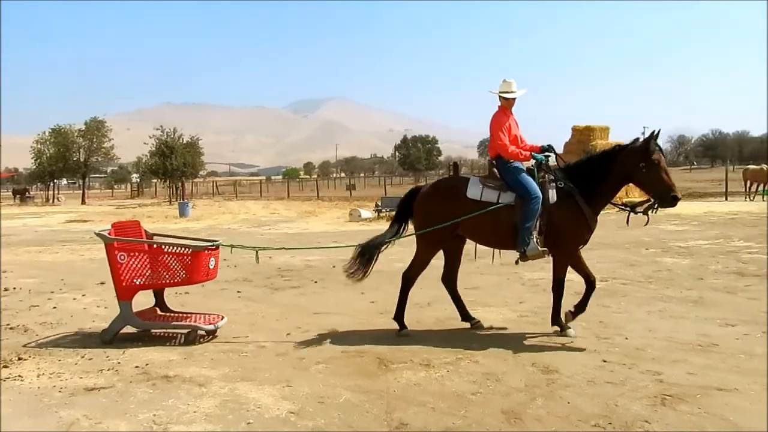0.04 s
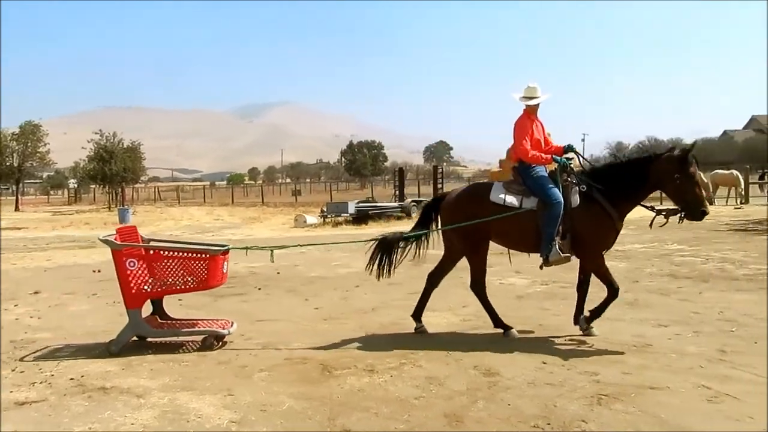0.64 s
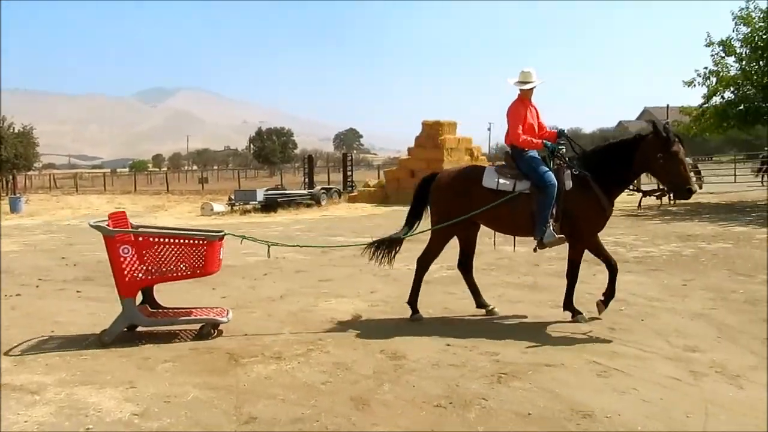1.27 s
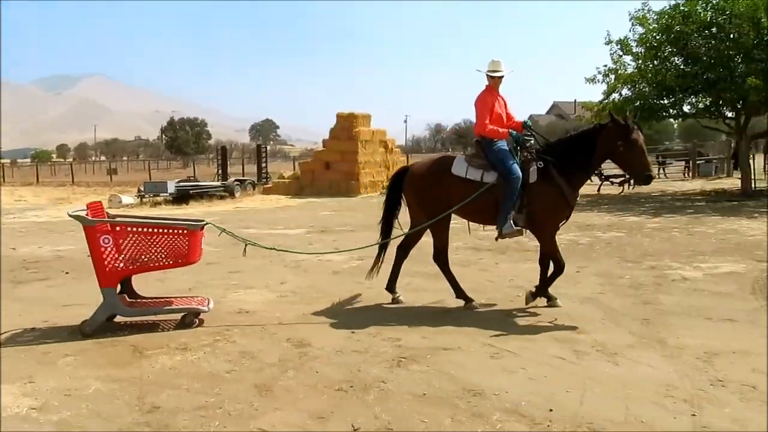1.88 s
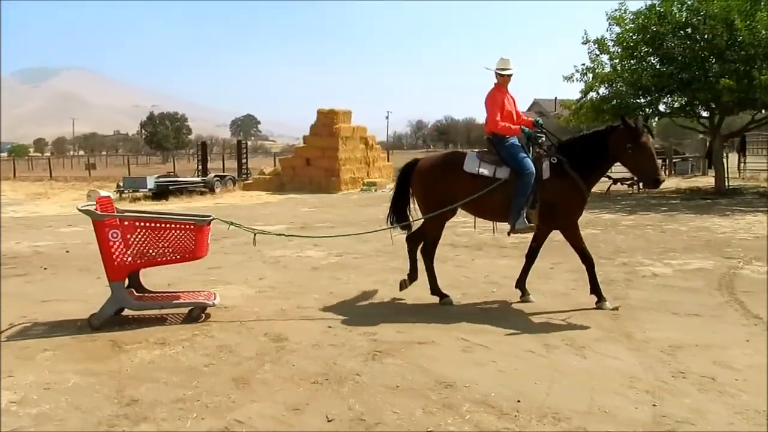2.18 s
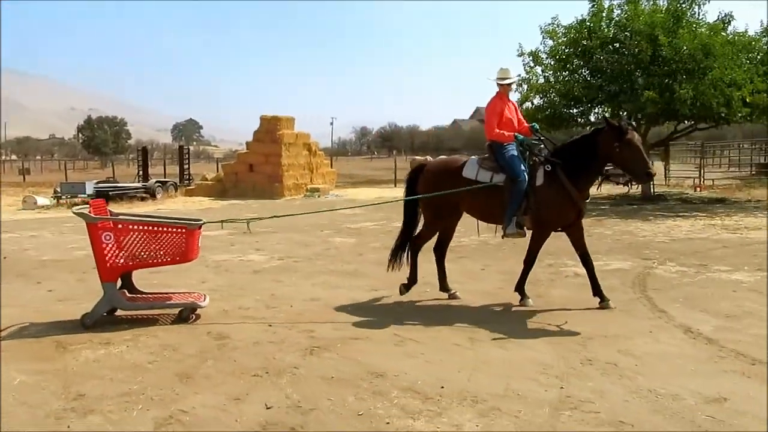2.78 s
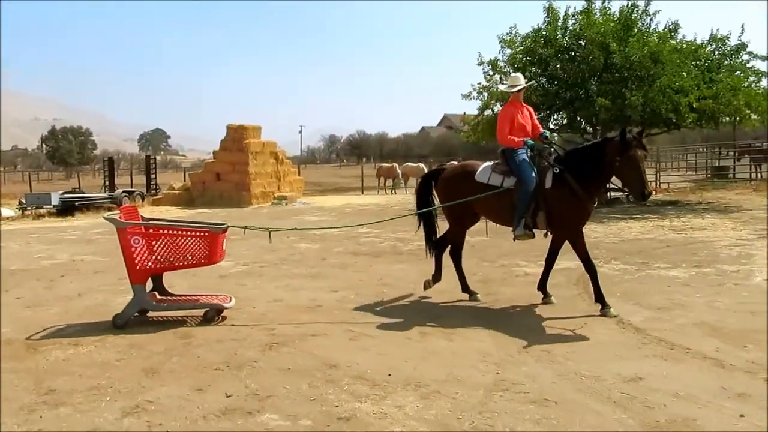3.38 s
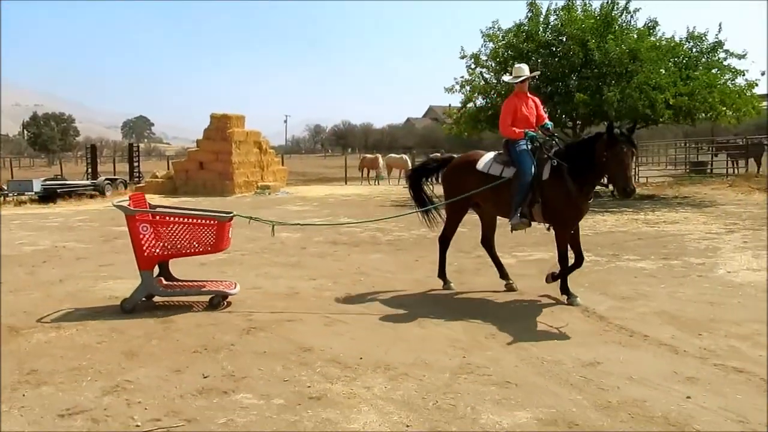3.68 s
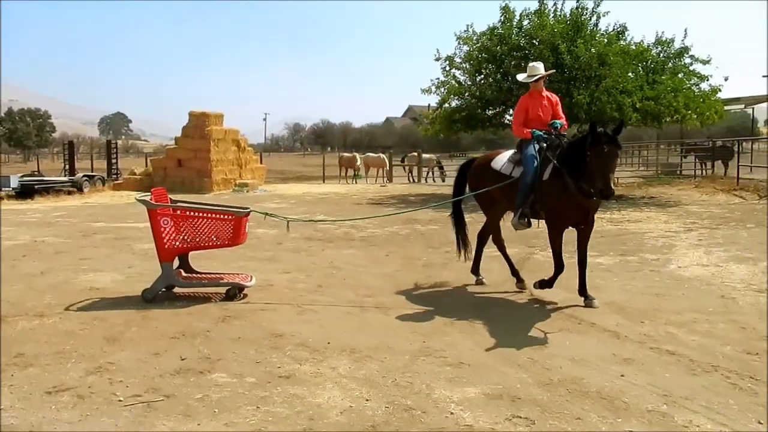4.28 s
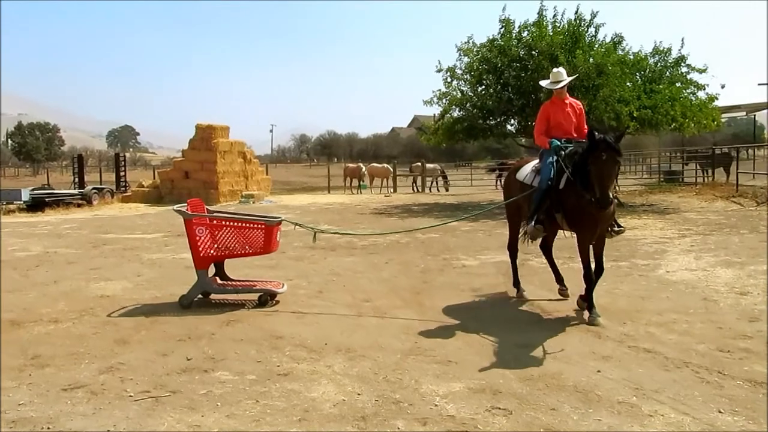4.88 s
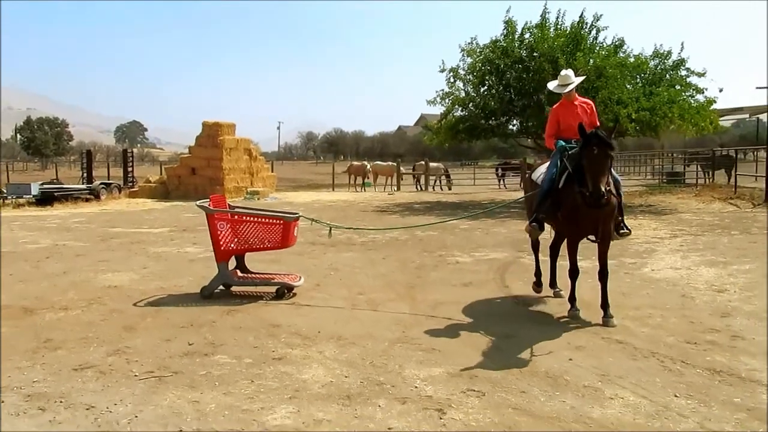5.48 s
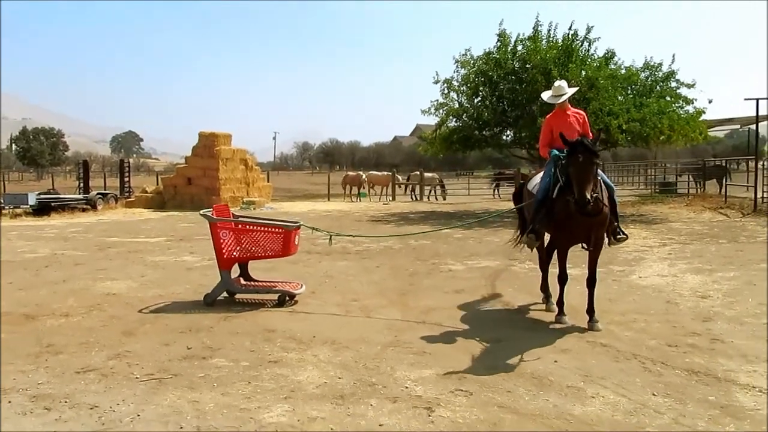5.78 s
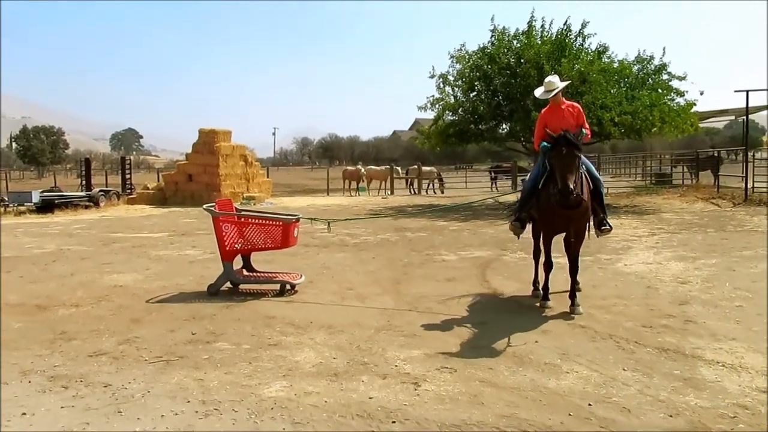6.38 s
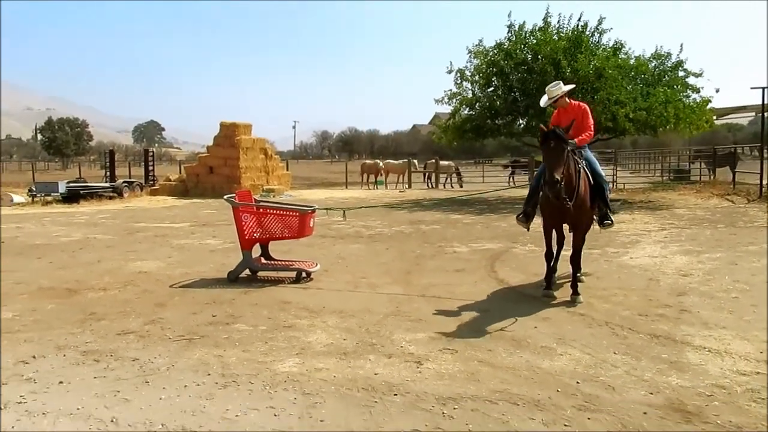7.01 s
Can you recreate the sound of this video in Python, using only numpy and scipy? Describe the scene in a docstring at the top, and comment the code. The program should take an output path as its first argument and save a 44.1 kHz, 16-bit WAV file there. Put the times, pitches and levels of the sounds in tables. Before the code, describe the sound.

An empty plastic shopping cart rattles over packed dirt from the start, slightly to the left, towed by a horse in an open yard. Gusts rumble and thump on the microphone for the first second. The basket buzzes, jolts and clacks in surges, loudest from 1 to 2 seconds and again near 3, with occasional hollow hoof knocks. The wind returns between about 2.2 and 3.6 seconds. Hooves scrape grit from 3.7 to 4.9 seconds as the rattle weakens, and the cart stops at about 5. Sharp harness clicks follow near 5.2 seconds, then light clops and scuffs as the horse settles. A small metal part pings thinly and faintly throughout. Distant birds give three brief, faint whistles between 5 and 7 seconds over soft outdoor air. Wind buffets build again from about 6.8 seconds to the end, just after 7.

```python
"""An empty plastic shopping cart rattles over packed dirt, towed on a rope by a horse that turns and stops.
Grit under the wheels keeps the basket buzzing, pebbles jolt it, and loose flaps and casters clack.
Hooves clop, scuff and drag, the harness clicks, and a small springy metal part pings thinly close by.
Gusts rumble and thump on the microphone; birds whistle far off in the quiet air of the open yard."""
import sys
import numpy as np
from scipy import signal
from scipy.fft import rfft, irfft, next_fast_len
from scipy.io import wavfile
from scipy.ndimage import uniform_filter1d

SR = 44100
rng = np.random.default_rng(int(sys.argv[2]) if len(sys.argv) > 2 else 0)


def master(y):
    """Save y as 16-bit WAV."""
    cut = np.clip(np.atleast_2d(y).T, -1, 1)
    pcm = np.round(cut * 32767)  # scale
    wavfile.write(sys.argv[1], SR, pcm.astype(np.int16))


N = 319725
TIME = np.arange(N) / SR
FFT_SIZE = next_fast_len(N + SR // 4)
FREQS = np.maximum(np.fft.rfftfreq(FFT_SIZE, 1 / SR), 1)
STOP_S = 5.1   # the cart comes to rest

# Levels in the tables are relative: each layer has its own trim.
# The cart surges as the rope tightens and slackens. Each row: time in seconds, rattle level in dB.
ROLL = [(0.0, -40.5), (0.45, -43.5), (0.75, -43), (1.0, -31), (1.3, -36), (1.55, -37), (1.85, -37),
        (2.0, -47.5), (2.25, -39), (2.45, -48.5), (2.8, -54.5), (2.88, -41), (2.97, -33), (3.15, -45),
        (3.66, -39.5), (3.88, -51), (4.08, -42), (4.25, -54), (4.9, -53.5)]
# The basket jolts on its frame. Each row: start in seconds, level in dB, extra treble in dB.
JOLTS = [(0.027, -16, 6.5), (0.11, -26, 9), (0.153, -31, -5), (0.2, -27, -2), (0.237, -19, -5),
         (0.282, -28, 2), (0.305, -19.5, 6.5), (0.371, -20, 1), (0.436, -23.5, 8), (0.481, -17, 4),
         (0.521, -17, 9.5), (0.572, -18, 0.5), (0.608, -16, 0.5), (0.679, -18.5, -4), (0.713, -32, 17),
         (0.734, -22, -10), (0.759, -20, 4), (0.816, -17, -1), (0.878, -15.5, -8), (0.925, -6.5, 3.5),
         (0.951, -19.5, 10), (0.976, -15, 4.5), (1.006, -14.5, 3), (1.027, -13.5, 0), (1.08, -15.5, 1.5),
         (1.108, -15.5, 0), (1.162, -16.5, 6.5), (1.232, -16, 4), (1.274, -11.5, 1), (1.3, -14, 2.5),
         (1.32, -17.5, 7.5), (1.364, -7.5, 0.5), (1.411, -15.5, -9), (1.445, -16, 3), (1.486, -14, -0.5),
         (1.574, -15, 2), (1.622, -21.5, 6), (1.644, -7, 6.5), (1.679, -16.5, -0.5), (1.742, -13.5, 3.5),
         (1.782, -13, 0), (1.827, -13.5, 5), (1.843, -20, -6), (1.879, -13.5, -1), (1.912, -17, -12),
         (1.951, -13, -1.5), (1.967, -19.5, 0), (2.055, -22, 1), (2.037, -18.5, -0.5), (2.132, -13.5, -4.5),
         (2.172, -18.5, 0), (2.202, -19.5, 5), (2.214, -26, 1), (2.31, -20.5, -0.5), (2.353, -35, 0),
         (2.5, -25, -2), (2.713, -26, 3.5), (2.855, -19.5, -12), (2.885, -14.5, 3), (2.934, -8, -15),
         (2.969, -15, 5.5), (3.043, -14.5, 0.5), (3.122, -23, 12.5), (3.147, -21.5, 8), (3.196, -19.5, 12),
         (3.243, -16.5, -1), (3.304, -17, -7), (3.347, -30, -15), (3.433, -14, 2), (3.485, -16, -2),
         (3.506, -25.5, 6), (3.543, -19, 4.5), (3.643, -14, 1.5), (3.662, -13.5, 1), (3.72, -16.5, -5),
         (3.805, -20.5, -8), (3.832, -35, -3), (3.91, -26, 1), (3.976, -20.5, -3), (4.06, -21, -9),
         (4.082, -25, -6), (4.111, -26, -12), (4.173, -19, -5), (4.341, -22.5, -10), (4.468, -27.5, -2),
         (4.567, -27.5, -9), (4.7, -21.5, 0.5), (4.765, -22, -1.5)]
# The cart's broad tone. Each row: frequency in Hz, level in dB.
CART_EQ = [(60, -13.5), (150, -36), (300, -8), (550, -8.5), (750, 2.5), (980, -3.5), (1600, 4), (3000, -9),
           (4500, -15.5), (6500, -24), (8500, -33), (12000, -37), (15500, -43)]
# Peaks and dips in the tone of the cart's rattle. Each row: centre in Hz, width in Hz, gain in dB.
RATTLE_PEAKS_DIPS = [(797, 56, 2.5), (1640, 320, -5.5), (1980, 250, -7.5), (2360, 220, 2.5),
                     (2700, 60, 0.5), (3060, 220, 5), (3450, 310, -1), (3700, 130, 5.5), (4870, 200, -1.5),
                     (5600, 190, 0), (6560, 270, 1.5)]
# The cart sits to the left. Each row: frequency in Hz, phase lead of the left channel in radians.
LEFT_LEAD = [(1500, 0), (3000, 0.48), (5000, 0.97), (9000, 0), (15000, 1.7)]
# Stereo width of near sounds. Each row: frequency in Hz, side against mid in dB.
NEAR_WIDTH = [(60, -35), (350, -63), (900, -52), (1700, -26), (3000, -15.5), (5000, -7), (9000, -2),
              (15000, 0.5)]
# Hard knocks of hooves and the cart's basket, some with two quick contacts.
# Each row: start in seconds, level in dB, pitch in Hz.
KNOCKS = [(0.086, -25.5, 1640), (1.6436, -16, 1080), (1.6479, -18, 1000), (2.598, -23.5, 1110),
          (2.935, -31, 1500), (3.337, -18.5, 1470), (4.896, -21.5, 1570), (5.05, -35, 790),
          (5.095, -30, 900), (5.196, -24, 1090), (5.339, -29.5, 1610), (5.364, -37, 1290),
          (5.735, -39, 1190), (6.067, -40, 1590), (6.172, -39, 1450), (6.275, -28.5, 1900),
          (6.279, -27.5, 1390), (6.32, -40, 1490), (6.452, -34.5, 1310), (6.471, -39, 1500),
          (6.507, -39, 1450), (6.602, -36, 1150), (6.673, -40.5, 1510), (6.919, -39, 2700),
          (7.232, -34, 1550)]
# The tone of loose dirt. Each row: frequency in Hz, level in dB.
SCUFF_EQ = [(250, -23), (550, 27), (2500, 10), (4000, -35), (9000, -37)]
# Hooves drag as the horse turns. Each row: start in seconds, length in seconds, level in dB.
SCRAPES = [(3.65, 0.077, -42.5), (3.97, 0.02, -49), (4.002, 0.13, -44), (4.668, 0.07, -43.5),
           (4.758, 0.022, -40), (4.828, 0.094, -51.5), (6.215, 0.049, -53), (6.287, 0.067, -54),
           (6.44, 0.07, -64)]
# Harness clicks. Each row: start in seconds, level in dB, 60 dB decay time in seconds, low cut in Hz,
# ring pitch in Hz, ring against snap in dB.
TACK_CLICKS = [(0.32, -20.5, 0.011, 2500, 5840, -2), (0.926, -27, 0.025, 1010, 5600, 6),
               (4.015, -26, 0.023, 4960, 5940, -6), (4.746, -23.5, 0.013, 3500, 6000, -2),
               (5.195, -13, 0.006, 900, 4200, -13), (5.2, -25.5, 0.032, 1200, 4100, -12),
               (5.212, -28, 0.004, 1500, 2870, -14), (5.3385, -5, 0.012, 12000, 13700, -8),
               (5.361, -36, 0.04, 1500, 3570, -20), (5.735, -35, 0.042, 1000, 3100, -28),
               (6.229, -43, 0.1, 1000, 2900, -30), (6.276, -33.5, 0.065, 1000, 2780, -26)]
# The tone of those clicks. Each row: frequency in Hz, level in dB.
TACK_EQ = [(300, 16), (1000, -0.5), (1550, 3.5), (2400, 1), (2950, 9.5), (3250, 3), (3600, 3.5), (4250, 0),
           (5000, -6.5), (6400, -10), (8000, -17), (13000, -24), (15500, -30)]
# Metal pings. Each row: start in seconds, first upper mode's level in dB, upper pair's detune in Hz,
# second upper mode against the first in dB, first and second lower modes' levels in dB.
PINGS = [(0.0, -61, 8, -1, -68, -75), (0.215, -64, 3, -12, -82, -70), (0.481, -58, 29, -9, -58, -75),
         (0.575, -58, 45, -10, -70, -75), (1.124, -60, 4, 11, -81, -57), (1.732, -60, 13, 4, -69, -69),
         (2.428, -58.5, -10, -1, -79, -63), (2.748, -48.5, -10.5, -4, -66, -61),
         (2.987, -55, -10.5, -2, -64, -66), (3.17, -62, 3, -10, -72, -65), (3.4, -70, 19, -5, -66, -63),
         (3.679, -54, 7, -7, -68, -60), (3.92, -52, 2, -7, -69, -70), (4.17, -63, 14, -15, -70, -72),
         (4.737, -60, 56, -15, -77, -74), (4.914, -57, 11, 1, -69, -71), (5.07, -72, 35, -16, -70, -69),
         (5.404, -53.5, 3, -5, -55.5, -67), (5.69, -64, 42, -17, -71, -72), (5.85, -76, 40, -15, -66, -82),
         (6.042, -51, 0, -19, -68, -70), (6.332, -48.5, 39.5, -18, -65, -80),
         (6.475, -72, 38, -18, -64, -78), (7.233, -59, 10, -10, -70, -70)]
# The pings' beating upper pair. Each row: pitch before detuning in Hz, 60 dB decay time in seconds.
UPPER_MODES = [(12123, .95), (12161, .8)]
# Gusts. Each row: time of reaching full strength in seconds, hold in seconds, level in dB.
GUSTS = [(0.01, 0.03, -16.5), (0.259, 0.061, -16.5), (0.344, 0.019, -19), (0.677, 0.029, -19.5),
         (0.756, 0.11, -19.5), (1.747, 0.13, -30.5), (2.247, 0.035, -18.5), (2.389, 0.057, -19),
         (2.516, 0.057, -24.5), (2.774, 0.089, -23), (2.892, 0.099, -28.5), (3.222, 0.085, -32),
         (3.352, 0.082, -21.5), (3.447, 0.15, -25.5), (3.622, 0.057, -29.5), (3.744, 0.065, -31),
         (3.886, 0.042, -38), (4.24, 0.091, -36), (4.42, 0.055, -39), (4.731, 0.02, -42),
         (4.948, 0.027, -34), (5.075, 0.019, -28.5), (5.162, 0.042, -27), (5.259, 0.024, -26),
         (5.381, 0.04, -33), (5.583, 0.035, -30.5), (5.715, 0.032, -31.5), (5.918, 0.08, -28.5),
         (6.048, 0.062, -29), (6.164, 0.012, -29.5), (6.218, 0.034, -34.5), (6.332, 0.004, -27.5),
         (6.433, 0.021, -27), (6.492, 0.015, -31.5), (6.58, 0.011, -34), (6.742, 0.013, -27.5),
         (6.805, 0.0072, -28.5), (6.875, 0.053, -29.5), (6.984, 0.012, -19), (7.065, 0.31, -25.5)]
# The wind bed, stiff at first, then a light breeze. Each row: time in seconds, level in dB.
WIND_BED = [(0.0, -16.5), (0.34, -23), (0.4, -24.5), (0.6, -20.5), (0.87, -25.5), (0.95, -42), (1.3, -43.5),
            (2.1, -40), (2.33, -29), (2.66, -33.5), (2.72, -61), (3.0, -37), (3.18, -47), (3.9, -42.5),
            (4.15, -50.5), (4.8, -49), (5.0, -36), (5.6, -49), (7.25, -47)]
# Single eddies thump the microphone. Each row: centre time in seconds, level in dB, pitch in Hz.
BUFFETS = [(0.023, -2.5, 407), (0.047, -5, 305), (0.091, -14, 250), (0.105, -10, 236), (0.161, -11, 286),
           (0.231, -11.5, 196), (0.256, -13, 382), (0.3, -7, 250), (0.319, -10, 331), (0.362, -2.5, 360),
           (0.459, -12, 292), (0.57, -8.5, 210), (0.636, -15, 225), (0.682, -9, 170), (0.703, -12, 264),
           (0.776, -8.5, 278), (0.822, -3, 315), (0.839, -1.5, 393), (0.88, -20, 262), (2.104, -18, 151),
           (2.251, -14.5, 66), (2.257, -9, 330), (2.404, -7.5, 207), (2.407, -13, 69), (2.446, -8.5, 229),
           (2.565, -12, 167), (2.805, -6.5, 230), (2.825, -7, 207), (3.363, -16, 258), (3.382, -12, 210),
           (3.42, -6, 340), (3.481, -12.5, 177), (3.514, -17.5, 199), (3.569, -14, 154), (3.591, -13, 258),
           (5.204, -16, 176), (5.266, -14, 220), (6.121, -14.5, 154), (6.392, -17, 186),
           (6.755, -11.5, 157), (6.811, -8.5, 224), (6.869, -14.5, 164), (6.929, -14, 135),
           (6.993, -6.5, 348), (7.009, -6, 157), (7.105, -6.5, 262), (7.129, -9, 159), (7.192, -9.5, 210),
           (7.241, -6, 140), (7.243, -12.5, 61)]
# Tones of light wind, strong wind and the roar on top. Each row: frequency in Hz, level in dB.
BREEZE_EQ = [(20, -42), (35, -25.5), (70, -5.5), (105, -0.5), (150, -0.5), (210, -4), (350, -13.5),
             (470, -27.5), (540, -42.5), (900, -79)]
GUST_EQ = [(20, -45), (35, -39), (70, -22.5), (130, -2), (260, 0), (400, -2), (480, -5.5), (535, -32.5),
           (650, -39), (1200, -71)]
ROAR_EQ = [(350, -18.5), (520, 7), (680, 8), (850, -2), (1200, -21), (2000, -79)]
# Stereo width of the wind. Each row: frequency in Hz, side against mid in dB.
WIND_WIDTH = [(40, -40), (90, -43), (170, -28), (350, -14.5), (700, 1)]
# The wind's angle on the ports shifts as the microphone turns.
# Each row: time in seconds, side gain in dB, roar in a strong wind in dB.
WIND_ANGLE = [(0, -9, -28.5), (0.3, -8, -21.5), (0.9, -13.5, -15), (2.3, -7, -21), (2.8, 2.5, -18),
              (6.5, 2.5, -30), (7.25, 13.5, -20)]
# Far birds. Each row: start in seconds, length in seconds, first and last pitch in Hz, level in dB.
BIRD_CALLS = [(5.024, 0.089, 3300, 3210, -60), (5.776, 0.048, 3220, 3180, -50.5),
              (6.733, 0.099, 830, 930, -49)]
# The tone of the yard's still air. Each row: frequency in Hz, level in dB.
YARD_EQ = [(25, -26), (80, 11.5), (160, -24.5), (400, 4), (900, -0.5), (2000, -6.5), (3200, -8),
           (4500, -12), (5700, -14), (9000, -19.5), (12500, -24.5), (14000, -33), (15500, -37)]
# Stereo width of that air. Each row: frequency in Hz, side against mid in dB.
YARD_WIDTH = [(60, -43), (300, -23), (800, -7), (1700, 0.5), (3000, -3.5), (9000, -4)]


def cart(split_hz=2600, brightening=0.13, patchy_db=1.38, grain_db=2, reference_db=-44):
    """Rolling and jolts shake the cart: contacts on the basket sound dull, on frame and casters bright."""
    pace = from_db(in_time(ROLL) - reference_db)
    rolling = wheel_grind(pace)
    jolts = [*JOLTS, *pebble_jolts()]
    ripple_db = sum(db / (1 + (2 * (FREQS - hz) / width) ** 2) for hz, width, db in RATTLE_PEAKS_DIPS)
    body = from_db(curve_db(CART_EQ) + ripple_db)
    bright = 1 / (1 + (split_hz / FREQS) ** 4)
    out = 0
    for is_bright, share in enumerate((1 - bright, bright)):
        power = (rolling * pace ** (is_bright * brightening)) ** 2   # faster rolling sounds brighter
        force = np.sqrt(power + jolt_power(jolts, is_bright))
        contacts = evened(white(), window_s=0.0076) * force
        contacts *= from_db(patchy_db * drift(15.3) + grain_db * drift(220))
        band = body * np.sqrt(share + 1e-9)
        band_gain = np.sqrt(np.sum(band ** 2) / np.sum(body ** 2))
        out = out + band_gain * coloured(contacts, 20 * np.log10(band), NEAR_WIDTH)
        if not is_bright:
            out = out + clacks(force)
    phase_shift = np.exp(.5j * curve_db(LEFT_LEAD) * np.array([[1], [-1]]))
    return irfft(rfft(out, FFT_SIZE) * phase_shift, FFT_SIZE)[:, :N]


def wheel_grind(pace, level_db=-3, bump_rate=120, bump_t60=0.025, steady=0.99):
    """The envelope of grit under the wheels: at speed the bumps crowd into a continuous crunch."""
    bumps = (rng.random(N) < pace * bump_rate / SR) * rng.uniform(0.33, 1, N) / pace
    bumps = signal.fftconvolve(bumps, decay(bump_t60))[:N]
    shake = rms_one(steady + rms_one(bumps))
    fade_out = np.clip((STOP_S - TIME) * 10, 0, 1)
    return from_db(in_time(ROLL) + level_db) * shake * fade_out


def pebble_jolts(count=40, above_roll_db=15.5, spread_db=5, treble_spread_db=4, hardest_db=-20):
    """Pebbles jolt the basket at random, harder the faster it rolls, up to a limit; rows as in JOLTS."""
    when, size, colour = rng.uniform(-0.56, 1, (count, 3)).T
    s = (np.arange(count) + .5 + when / 2) * STOP_S / count
    db = np.interp(s, *np.transpose(ROLL)) + above_roll_db + spread_db * size
    return np.transpose([s, np.minimum(db, hardest_db), treble_spread_db * colour])


def jolt_power(jolts, is_bright, crack_db=-12, chatter_db=-12.5, hard_db=-12, swell_s=0.006):
    """The power envelope of the jolts in one band: each is a crack inside a swell of dying chatter."""
    crack, chatter = decay(t60=0.022), decay(t60=0.11)
    chatter *= 1 - np.exp(-(TIME[:len(chatter)] / swell_s) ** 2)
    power = np.zeros(N)
    for s, db, treble_db in jolts:
        lift_db = is_bright * treble_db
        hardness = min(from_db(db - hard_db), 1)   # only hard jolts crack cleanly
        add(power, s, (from_db(db + crack_db + lift_db) * hardness * crack) ** 2)
        add(power, s - swell_s / 2, (from_db(min(db, hard_db) + chatter_db + lift_db) * chatter) ** 2)
    return power


def clacks(force, per_s=150, ring_cycles=34, level_db=-4):
    """Loose flaps and casters knock at random, each ringing briefly at a pitch of its own."""
    out, pitches_hz = np.zeros(N), np.geomspace(750, 4200, num=22)
    knocks = (rng.random(N) < per_s / SR) * rng.standard_normal(N) * np.sqrt(SR / per_s) * force
    struck = rng.integers(0, len(pitches_hz), N)
    for k, hz in enumerate(pitches_hz):
        r, w = from_db(-60 * hz / (ring_cycles * SR)), 2 * np.pi * hz / SR
        gain = np.sqrt(2 * (1 - r * r)) * np.sin(w) * from_db(np.interp(hz, *np.transpose(CART_EQ)))
        out += signal.lfilter([0, gain], [1, -2 * r * np.cos(w), r * r], knocks * (struck == k) + 1e-18)
    return from_db(level_db) * out


def hoof_and_basket_knocks(band_ratio=1.4, thud_db=-9, thud_band_hz=(325, 1300), crumble_db=-29):
    """A hoof or the basket hits with one hard crack: a hollow clop, a duller thud and a crumbly tail."""
    out = np.zeros(N)
    fade = np.pad(decay(t60=0.049), (0, SR // 100))
    for s, db, hz in KNOCKS:
        crumble = from_db(crumble_db) * fade * rng.standard_normal(len(fade))
        blow = signal.unit_impulse(len(fade)) + crumble
        clop = filtered(blow, 3, [hz / band_ratio, hz * band_ratio], "band")
        clop += from_db(thud_db) * filtered(blow, 2, thud_band_hz, "band")
        add(out, s, from_db(db) * clop / np.abs(clop).max())
    return out


def scuffs(level_db=-28, t60=0.24):
    """A brief hiss of loose dirt trails each knock, louder after a hard one."""
    power = np.zeros(N)
    for s, db, _ in KNOCKS:
        add(power, s, (from_db(db + level_db) * decay(t60)) ** 2)
    return coloured(white() * np.sqrt(power), curve_db(SCUFF_EQ), NEAR_WIDTH)


def scrapes(grains_per_s=900, size_db=4, ring_cycles=16):
    """Grit is crushed under a dragging hoof: a crowd of tiny snaps, each with a pitch of its own."""
    force = np.zeros(N)
    for s, length, db in SCRAPES:
        add(force, s, from_db(db) * signal.windows.tukey(int(length * SR), .5))
    sizes = from_db(size_db * np.minimum(rng.exponential(1, N), 3)) * rng.choice([-1, 1], N)
    snaps = (rng.random(N) < grains_per_s / SR) * sizes
    grit, pitches_hz = np.zeros(N), np.geomspace(1000, 3900, num=12)
    struck = rng.integers(0, len(pitches_hz), N)
    for k, hz in enumerate(pitches_hz):
        r, w = from_db(-60 * hz / (ring_cycles * SR)), 2 * np.pi * hz / SR
        grit += signal.lfilter([np.sin(w)], [1, -2 * r * np.cos(w), r * r], snaps * (struck == k) + 1e-18)
    return force * evened(grit[None], window_s=0.017)


def tack(level_db=-4, slip_s=0.0019):
    """Hard little parts of the harness slip and snap together, each with a brief ring."""
    out = np.zeros((2, N))
    for s, db, t60, low_cut_hz, ring_hz, ring_db in TACK_CLICKS:
        fade = np.concatenate([np.ones(int(slip_s * SR)), decay(t60), np.zeros(SR // 200)])
        snap = evened(rng.standard_normal((2, len(fade))), window_s=0.0004)
        ring = from_db(ring_db) * np.sin(2 * np.pi * ring_hz * TIME[:len(fade)])
        add(out, s, from_db(db + level_db) * filtered((snap + ring) * fade, 1, low_cut_hz, "high"))
    return coloured(out, curve_db(TACK_EQ), NEAR_WIDTH)


def pings(level_db=-3.7, lower_hz=(5551, 5604), lower_t60=1.16, strike_db=6, strike_s=0.11,
          left_lag_rad=1.07, sway=0.0004, swell_db=2, flutter_db=2):
    """A small springy piece of metal rings in two beating pairs of modes: a loud strike, a long tail."""
    out = np.zeros((2, N))
    clock = np.cumsum(1 + sway * drift(2.5)) / SR   # the pitch wavers as the part swings
    swell = from_db(swell_db * drift(5))   # the lower pair comes and goes as it turns
    for (s, db, detune, second_db, *lower_dbs), turns in zip(PINGS, rng.random((len(PINGS), 3))):
        start = int(s * SR)
        upper = [(hz + detune, mode_db, t60, turns[0])
                 for (hz, t60), mode_db in zip(UPPER_MODES, (db, db + second_db))]
        lower = [(hz, mode_db, lower_t60, turn) for hz, mode_db, turn in zip(lower_hz, lower_dbs, turns[1:])]
        for hz, mode_db, t60, turn in upper + lower:
            fade = decay(t60)[:N - start]
            span = slice(start, start + len(fade))
            t = clock[span] - clock[start]
            fade *= np.minimum(t * 1000, 1)   # 1 ms attack
            if hz in lower_hz:
                fade *= swell[span]
            gain = from_db(mode_db + level_db + strike_db * np.exp(-t / strike_s))
            phase = 2 * np.pi * (hz * t + turn) - np.array([[left_lag_rad], [0]])
            add(out, s, gain * fade * np.sin(phase))
    return out * from_db(flutter_db * drift(25))   # the ring flutters as the part shakes


def wind(level_db=-1, lumpy_db=3.5, light_db=-30, strong_db=-18, roar_growth=2.5):
    """Turbulence at the microphone ports: harder wind makes smaller eddies and a higher rumble."""
    level = gust_envelope_db() + lumpy_db * np.minimum(drift(39), 1)   # lulls dip further than lumps rise
    strength = np.clip((level - light_db) / (strong_db - light_db), 0, 1) ** 2
    breeze, gust, roar = (evened(coloured(white(), curve_db(eq), WIND_WIDTH), window_s=0.0262)
                          for eq in (BREEZE_EQ, GUST_EQ, ROAR_EQ))
    width_db, roar_db = (in_time(np.array(WIND_ANGLE)[:, [0, k]]) for k in (1, 2))
    gust += from_db(roar_db + roar_growth * (level - strong_db)) * roar
    rumble = np.sqrt(1 - strength) * breeze + np.sqrt(strength) * gust
    left, right = from_db(level + level_db) * rumble + buffets()
    mid, side = (left + right) / 2, (left - right) / 2 * from_db(width_db)
    side = filtered(side, 2, 110, "high")   # big eddies cover both ports
    return np.array([mid + side, mid - side])


def gust_envelope_db(rise_db_per_s=605, fall_db_per_s=255):
    """Each gust swells quickly out of the wind bed, holds and dies away."""
    level = in_time(WIND_BED)
    for s, hold, db in GUSTS:
        early, late = np.maximum(s - TIME, 0), np.maximum(TIME - s - hold, 0)
        level = np.maximum(level, db - rise_db_per_s * early - fall_db_per_s * late)
    return level


def buffets(level_db=-1, low_cut_hz=55, high_cut_hz=500, side_db=-24, width_cycles=0.43):
    """A passing eddy swings the pressure up and down once or twice, a little differently at each port."""
    out, t = np.zeros((2, N)), TIME[:SR // 25] - 1 / 50
    for (s, db, hz), phase in zip(BUFFETS, rng.uniform(0, 2 * np.pi, len(BUFFETS))):
        skew = from_db(side_db) * hz / 250 * np.array([[1], [-1]])   # small eddies differ more
        swing = np.exp(-.5 * (t * hz / width_cycles) ** 2) * np.cos(2 * np.pi * hz * t + phase + skew)
        add(out, s + t[0], from_db(db + level_db) * swing)
    out = filtered(out, 2, low_cut_hz, "high")
    return signal.sosfiltfilt(signal.butter(6, high_cut_hz, fs=SR, output="sos"), out)


def birds():
    """Far birds give short, faint, gliding whistles."""
    out = np.zeros(N)
    for s, length, start_hz, end_hz, db in BIRD_CALLS:
        hz = np.linspace(start_hz, end_hz, int(length * SR))
        add(out, s, from_db(db) * np.hanning(len(hz)) * np.sin(2 * np.pi * np.cumsum(hz) / SR))
    return out


def yard_air(level_db=-54):
    """The open air lays a soft, steady bed of noise under everything."""
    return from_db(level_db) * coloured(white(), curve_db(YARD_EQ), YARD_WIDTH)


def yard_reverb(x, wet_db=-18, t60=0.11, dull_hz=4000):
    """Ground and fences add a faint, dull tail."""
    fade = decay(t60)
    tail = coloured(white(), -10 * np.log10(1 + (FREQS / dull_hz) ** 2), NEAR_WIDTH)[:, :len(fade)] * fade
    tail *= from_db(wet_db) / np.sqrt(np.sum(tail ** 2) / 2)
    return x + signal.fftconvolve(x, tail, axes=1)[:, :N]


def from_db(db):
    """Decibels to gain."""
    return 10 ** (np.asarray(db) / 20)


def rms_one(x):
    """Scale to rms 1."""
    return x / np.sqrt(np.mean(x ** 2) + 1e-20)


def in_time(rows):
    """An automation curve at every sample."""
    return np.interp(TIME, *np.transpose(rows))


def curve_db(points):
    """A curve at every frequency, its points joined on a log-frequency axis."""
    hz, db = np.transpose(points)
    return np.interp(np.log(FREQS), np.log(hz), db)


def drift(rate_hz):
    """A smooth random wobble with a spread of 1."""
    hop = 40
    r = np.exp(-2 * np.pi * hop * rate_hz / SR)
    slow = signal.lfilter([1], [1, -2 * r, r * r], rng.standard_normal(N // hop + 2002))[2000:]
    return np.interp(np.arange(N) / hop, np.arange(len(slow)), rms_one(slow))


def coloured(pair, eq_db, width):
    """Mid and side become left and right through a causal EQ that keeps the power of white noise."""
    cepstrum = irfft(np.log(rms_one(from_db(eq_db))), FFT_SIZE)
    cepstrum[1:FFT_SIZE // 2] *= 2   # fold to minimum phase
    cepstrum[FFT_SIZE // 2 + 1:] = 0
    mid, side = rfft(pair, FFT_SIZE) * np.exp(rfft(cepstrum))
    side = side * from_db(curve_db(width))
    return irfft(np.array([mid + side, mid - side]), FFT_SIZE)[:, :N]


def filtered(x, order, hz, kind):
    """A filter with a flat passband."""
    return signal.sosfilt(signal.butter(order, hz, kind, fs=SR, output="sos"), x)


def white():
    """Two unrelated noises."""
    return rng.standard_normal((2, N))


def add(out, s, sound):
    """Mix a sound in at s seconds."""
    start = int(np.clip(s * SR, 0, N - 1))
    out[..., start:start + sound.shape[-1]] += sound[..., :N - start]


def decay(t60):
    """An envelope that falls by 60 dB in t60 seconds."""
    return np.exp(-np.log(1000) * TIME[:int(t60 * SR)] / t60)


def evened(x, window_s):
    """Hold the short-term level of a noise at 1."""
    power = uniform_filter1d(np.mean(x ** 2, axis=0), int(window_s * SR))
    return x / np.sqrt(np.abs(power) + 1e-9)


def scene(cart_pan_db=-0.43):
    """Cart and horse in the open yard, with the wind right at the microphone."""
    rattle = cart() * from_db([[cart_pan_db], [-cart_pan_db]])
    towing = rattle + hoof_and_basket_knocks() + scuffs() + scrapes() + tack()
    air = yard_air()
    return yard_reverb(towing + birds()) + pings() + air + wind()


def record(dry, cutoff_hz=15500):
    """A steep high cut takes off the very top."""
    return signal.sosfilt(signal.ellip(10, .1, 80, cutoff_hz, fs=SR, output="sos"), dry)


dry = scene()
out = record(dry)
master(out)
```